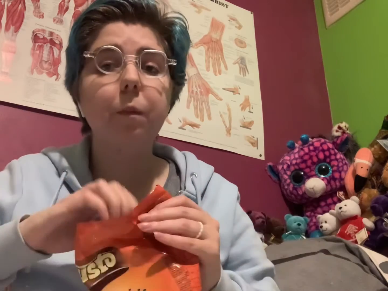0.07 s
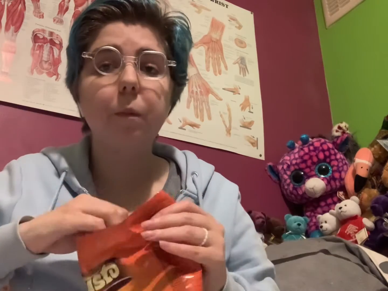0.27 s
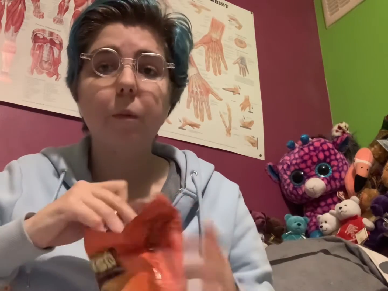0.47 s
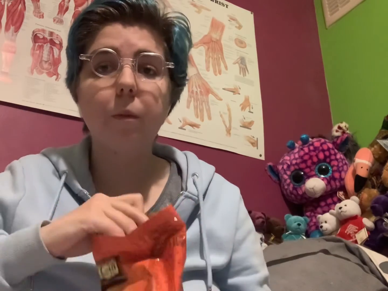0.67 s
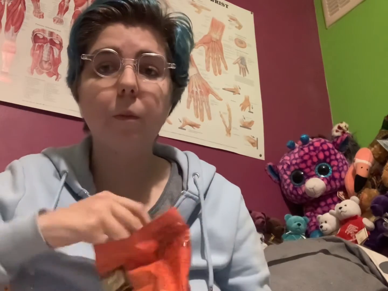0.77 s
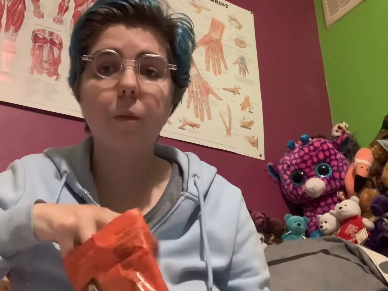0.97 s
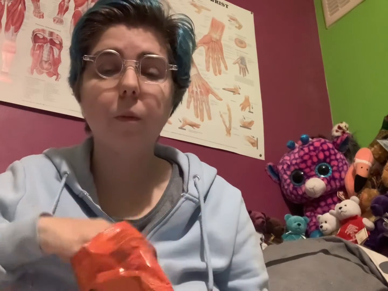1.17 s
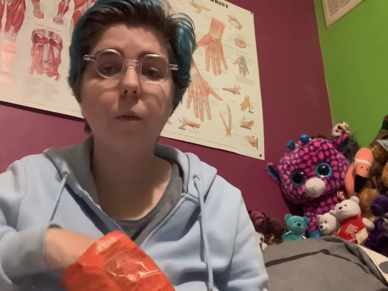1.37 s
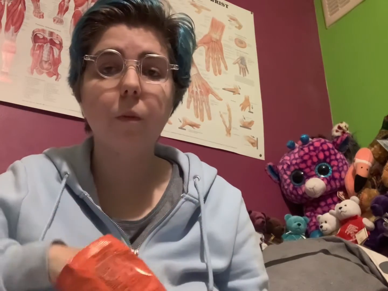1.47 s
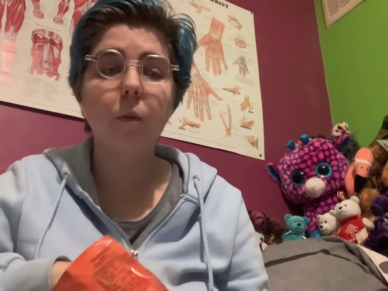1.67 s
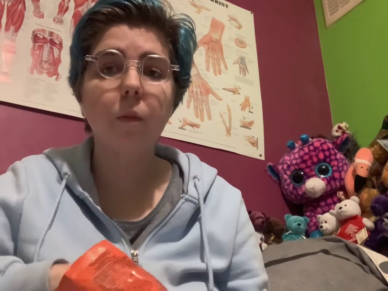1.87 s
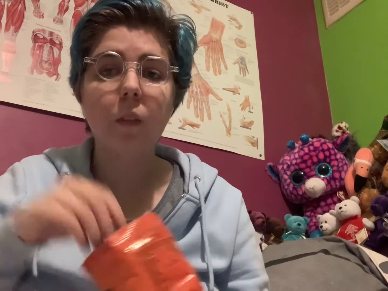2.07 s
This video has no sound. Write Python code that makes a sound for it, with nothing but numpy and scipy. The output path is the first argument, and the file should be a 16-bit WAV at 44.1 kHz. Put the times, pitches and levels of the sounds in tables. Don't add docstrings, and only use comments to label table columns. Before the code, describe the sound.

A foil crisp packet crinkles and snaps sharply in someone's hands, then rustles away softly.

```python
import sys
import numpy as np
from scipy import signal
from scipy.fft import rfft, irfft, next_fast_len
from scipy.io import wavfile
from scipy.ndimage import uniform_filter1d

SR = 44100
rng = np.random.default_rng(int(sys.argv[2]) if len(sys.argv) > 2 else 0)


def wav_out(sig):
    wavfile.write(sys.argv[1], SR, np.round(np.clip(np.atleast_2d(sig).T, -1, 1) * 32767).astype(np.int16))


def invert_db(level):
    return 10 ** (np.asarray(level, dtype=float) / 20)


N = 93315

# t/s, level/dB (peak), bag air/dB re peak, dullness/dB (panel minus sheen)
FOIL_SNAPS = [(0.0239, -31.5, -9.5, 18), (0.0383, -21, -30, 12), (0.0511, -7.5, -31, -26),
              (0.0553, -11.5, -25.5, -1.5), (0.077, -19.5, -22.5, 1), (0.0937, -18, -9, -5),
              (0.1123, -26, -28, -13), (0.117, -26, -21, -11), (0.1408, -24, -28, 8),
              (0.151, -14, -32, -14.5), (0.1587, -39, -33, 0), (0.1768, -25.5, -34, 13),
              (0.1946, -16.5, -33, -1.5), (0.2234, -19, -20, 3), (0.2295, -15.5, -16, -8.5),
              (0.2585, -23.0, -15.5, 5), (0.2691, -21, -11.5, -4), (0.2809, -29, -16, -39),
              (0.2981, -30, -11, 7), (0.3101, -26, -9, 6.0), (0.315, -27, -13.0, 8),
              (0.3201, -22.5, -28, 0), (0.3303, -30, -30, 7), (0.3393, -25, -3.5, 23.5),
              (0.3419, -16.5, -13.5, 5), (0.3536, -37, -31, -8), (0.3683, -20, -20, -21),
              (0.3724, -22.5, -9, 16), (0.3766, -34, -27, 0), (0.3802, -23, -29, -10),
              (0.3966, -26, -10, 13), (0.4002, -35, 3, 6), (0.4181, -20.5, -18, -12),
              (0.423, -12, -18.5, 2), (0.4294, -14.5, -14.5, -4.0), (0.4807, -33, -23, -11),
              (0.4962, -18.5, -22.0, -1), (0.5019, -18.5, -12, 16.5), (0.5245, -21.5, -12, 14),
              (0.5539, -31, -12, 27), (0.5877, -35.0, -19.0, 4), (0.609, -28, -19, 36),
              (0.6249, -26.5, -44, -10.0), (0.637, -28, -9, -17),
              (0.6486, -30.5, -8, -14.0), (0.663, -26, -18, 0), (0.667, -25, -10, -19),
              (0.697, -31.5, -12, -10), (0.708, -31, -32, -14), (0.7108, -27, -25, -2.0),
              (0.7308, -21, -20.5, -13), (0.736, -23.5, -12, 6), (0.7558, -22.5, -17.5, 19),
              (0.7661, -22, -18, 7), (0.7778, -23.0, -20, -12), (0.8106, -28, -14, -4),
              (0.822, -32, -5.5, -7.0), (0.8426, -19, -15, -17), (0.851, -20, -20.0, -13),
              (0.8599, -13, -22, -7.0), (0.879, -19.5, -23, 10), (0.8853, -27.5, -20, -9),
              (0.9125, -12, -21.5, -7.5), (0.9177, -2, -19.5, -3), (0.9459, -25, -8, 2.5),
              (0.9501, -28.5, -2, 10), (0.9698, -18.5, -21, -9), (0.9747, -11.5, -20, -7.5),
              (1.0112, -16.5, -11, 15), (1.0319, -23.5, -15.5, 6), (1.0778, -30, -8, 9),
              (1.0808, -32.5, -14, -2.0), (1.1092, -18.5, -14.5, -9), (1.1216, -28.5, -7, -18),
              (1.1321, -27.5, -12.5, -1.0), (1.1348, -23.0, -30, 6), (1.1453, -31, -15, -2),
              (1.1586, -32, -3, -7.5), (1.176, -11.5, -23.5, -5), (1.198, -6.5, -20.5, -14),
              (1.2022, -18, -28, -16), (1.2054, -19, -21.0, 13.5), (1.2112, -9, -30, -4.5),
              (1.2157, -6.5, -12.5, -4), (1.231, -18, -10, -7), (1.2486, -7.5, -27, -6),
              (1.263, -10.5, -10.5, -14.5), (1.302, -41, -10, -19),
              (1.3212, -16, -24.5, 21), (1.3657, -14.5, -15.0, -20), (1.3764, -27.5, -3.5, 0.0),
               (1.3971, -22, -11, -7), (1.4241, -27.5, -13.0, 10), (1.4353, -25, -8.0, -2),
               (1.472, -34, -18, 11), (1.4773, -40, -17.0, 4.0), (1.4812, -26.5, -10.5, 11),
               (1.498, -30, -11, -5), (1.5067, -29, -3.5, 23.5), (1.5456, -49, -11, 0.0),
               (1.5673, -32, -9, 8), (1.574, -26.0, -12.5, 3), (1.588, -22, -19.5, -3),
               (1.6112, -16.5, -25.5, -6.5), (1.6554, -19.5, -17.5, 5.5), (1.7107, -32.5, -17.5, 4),
               (1.7143, -33, -16, -8.0), (1.7318, -40.5, -11.0, -8), (1.748, -39, -15, -11),
               (1.7698, -40, -13, -3), (1.79, -44, -19, 4.0), (1.8016, -61, -31, -15),
               (1.8174, -48, 4.0, 5), (1.8273, -45, -8, 15), (1.8385, -44.5, -29, -8.0),
               (1.8543, -38.5, -15.5, 17), (1.8593, -45.5, -23, 3), (1.8929, -50, -10.5, 12),
               (1.9344, -47, -30, -1), (1.9526, -29.0, -24, -9.0), (1.964, -37, -9.5, -26),
               (1.971, -37, -19.0, -21), (1.9746, -45, -23.0, -26), (2.0082, -37, -27, 8),
               (2.038, -49.5, -26.0, 1.0), (2.0497, -58, -22, 16), (2.0737, -39, -40, -8),
               (2.098, -32.0, -27, -4), (2.1063, -32.0, -29, 7)]
# t/s, crackle level/dB, finger pressure level/dB
HANDLING = [(0, -52, -55), (.06, -44, -52.5), (.39, -46.5, -52.5), (.44, -36.5, -45), (.58, -54.5, -62),
            (.66, -45.5, -57.5), (.83, -42.5, -52), (.93, -28.5, -44.5), (1.072, -44.5, -55),
            (1.17, -41.5, -59), (1.219, -28, -43), (1.3, -38, -49.5), (1.542, -55.5, -64),
            (1.6, -39, -51.5), (1.7, -56.5, -56), (1.92, -71, -75.5), (2.01, -57.5, -65), (2.06, -66, -74)]
# f/Hz, level/dB
FOIL_COLOUR = [(200, -10), (600, 4), (1000, 0.5), (2300, -3), (3700, -6.5), (5500, -7), (9000, -13),
               (15000, -5.5)]
# f/Hz, level/dB
SQUEEZE_COLOUR = [(25, -48), (50, -7), (80, -6.5), (150, -1.5), (350, -3), (900, -21), (3000, -63.5)]
# f/Hz, lead/rad
PORT_LEAD = [(300, .5), (2600, .15), (5000, 1.3), (8000, 3.2), (10400, .9), (12800, 0), (14700, -2.9),
             (16200, -3.14)]
# f/Hz, level/dB
PORT_TILT = [(150, 6), (400, 3), (1100, -.5), (4000, 0)]
# f/Hz, level/dB
PORT_DIFFUSE = [(450, -6), (1500, -6), (5000, -2), (12500, -7), (14800, -15)]
# t/s, level/dB (peak), f/Hz
BAG_PUSHES = [(0.07, -48, 95.5), (0.098, -44, 82.5), (0.251, -44, 96), (0.277, -37, 255),
              (0.379, -40.5, 142), (0.401, -37.5, 168), (0.425, -49, 83), (0.459, -37, 225),
              (0.519, -44.5, 82.5), (0.764, -42.5, 164), (0.785, -49.5, 55), (0.864, -55, 55),
              (0.908, -38.5, 250), (0.919, -42.5, 83), (0.923, -32, 335), (0.947, -49, 72),
              (0.978, -36, 338), (1.195, -34.5, 340), (1.222, -34.5, 221), (1.25, -34, 293),
              (1.267, -28, 336), (1.279, -42.5, 72), (1.281, -36, 294)]


def evened(x):
    return x / np.sqrt(np.mean(x ** 2) + 1e-20)


def read(points, hz):
    f, value = np.transpose(points)
    return np.interp(np.log(hz + 1), np.log(f + 1), value)


def coloured(x, points):
    hz = abs(np.fft.fftfreq(4096, 1 / SR))
    log_gain = np.log(invert_db(read(points, hz)))
    min_phase = np.exp(np.conj(signal.hilbert(log_gain)))
    taps = np.fft.ifft(min_phase).real[:2048]
    return signal.oaconvolve(x, taps)[:len(x)]


def ring(x, hz, width_hz):
    r = np.exp(-np.pi * width_hz / SR)
    y = signal.lfilter([1, 0, -1], [1, -2 * r * np.cos(2 * np.pi * hz / SR), r * r], x)
    return y / abs(y).max()


def clicks(per_s, spread_db):
    level_db = spread_db * np.minimum(rng.exponential(1, N), 3)
    size = invert_db(level_db) * rng.choice([-1., 1.], N)
    return size * (rng.random(N) < per_s / SR)


def clumps(span_s):
    size = max(int(span_s * SR), 2)
    smooth = uniform_filter1d(rng.standard_normal(N), size)
    return evened(uniform_filter1d(smooth, size))


def hands(column):
    t_s = [row[0] for row in HANDLING]
    level_db = [row[column] for row in HANDLING]
    return invert_db(np.interp(np.arange(N) / SR, t_s, level_db))


def hush():
    return invert_db(-89) * evened(coloured(rng.standard_normal(N), FOIL_COLOUR))


def crackle():
    ticks_per_s, spread_db, tick_s, level_db, bands = 3000, 3.5, 0.00049, -1, 40
    t, out = np.arange(400) / SR, np.zeros(N)
    train = clicks(ticks_per_s, spread_db)
    band = rng.integers(0, bands, N)
    for k, hz in enumerate(np.geomspace(650, 14000, bands)):
        decay_s = tick_s * rng.uniform(0.11, 4.6)
        burst = rng.standard_normal(400) * np.exp(-t / decay_s)
        tick = evened(ring(burst, hz, 0.69 * hz)) * np.sqrt(hz / 5000)
        tick = tick + 0.13 * evened(burst)
        out += signal.oaconvolve(train * (band == k), tick)[:N]
    clump = invert_db(1.55 * clumps(0.005) + 0.8 * clumps(0.025))
    return invert_db(level_db) * hands(column=1) * evened(coloured(out * clump, FOIL_COLOUR))


def thuds():
    thuds_per_s, spread_db, level_db, apart = 300, 2, -1, 1
    a, b = (evened(coloured(clicks(thuds_per_s, spread_db), SQUEEZE_COLOUR)) for _ in "LR")
    both = np.array([a, evened(a + apart * b)])
    return invert_db(level_db) * hands(column=2) * invert_db([[3], [-3]]) * both


def snaps():
    creep_s, creep_db, rise_s, snap_s = 0.0042, -31, 0.00021, 0.00071
    rattle_s, rattle_db = 0.0057, -21.5
    edge_hz, edge_db, sheen_hz, sheen_db = 5640, -3.5, 9880, -7.5
    panel_hz, panel_width_hz, panel_db = 2230, 1120, -7
    bag_hz, bag_width_hz, bag_lift_db, bag_delay_s = 544, 164, 1.5, 0.00141
    t, out = (np.arange(1500) - 400) / SR, np.zeros(N + 1900)
    late = np.exp(-abs(t - bag_delay_s) / snap_s)
    creep = invert_db(creep_db) * np.exp(t / creep_s)
    after = invert_db(rattle_db) * np.exp(-t / rattle_s)
    around = np.where(t > 0, after, creep)
    crack_shape = np.exp(np.minimum(-t / snap_s, t / rise_s))
    for s, db, bag_db, dull_db in FOIL_SNAPS:
        noise, lumps = rng.standard_normal(1500), rng.standard_normal(1500)
        shift = rng.uniform(0.87, 1.217, 4)
        rattle = around * invert_db(5.67 * evened(uniform_filter1d(lumps, size=24)))
        crack = noise * (crack_shape + rattle)
        edge = invert_db(edge_db) * ring(crack, edge_hz * shift[0], 3200)
        panel = invert_db(panel_db + dull_db / 2) * ring(crack, panel_hz * shift[1], panel_width_hz)
        sheen = invert_db(sheen_db - dull_db / 2) * ring(crack, sheen_hz * shift[2], 10000)
        push = late * (1 + lumps) + uniform_filter1d(crack, size=12)
        air = ring(ring(push, bag_hz * shift[3], bag_width_hz), bag_hz, 1440)
        sound = edge + panel + sheen + invert_db(bag_db + bag_lift_db) * air
        at = round(s * SR)
        out[at:at + 1500] += invert_db(db + 1.5) * sound / abs(sound).max()
    return out[410:N + 410]


def pushes():
    width_cycles, apart_rad = 0.89, 0.86
    t, out = np.arange(N) / SR, np.zeros((2, N))
    for s, db, hz in BAG_PUSHES:
        start, spread = rng.random(2)
        at = round(s * SR)
        near = slice(max(at - 3000, 0), at + 3000)
        turns = (t[near] - s) * hz
        lag = np.array([[0], [apart_rad * (1 + spread)]])
        phase = 2 * np.pi * (turns + start) - lag
        out[:, near] += invert_db(db) * np.exp(-0.5 * (turns / width_cycles) ** 2) * np.cos(phase)
    return out * invert_db([[3], [-3]])


def tail(t60_s, count):
    at = np.arange(count) * 20 + rng.integers(0, 20, count)
    taps = np.zeros(20 * count)
    taps[at] = rng.choice([-1., 1.], count) * invert_db(-60 * at / SR / t60_s)
    return taps / np.linalg.norm(taps)


def ports(x):
    turn_s, room_t60_s, room_db = 0.05, 0.12, -4.5
    dull_hz, dull_db_per_hz = 11500, -0.0016
    size = next_fast_len(N + 8000)
    hz = np.fft.rfftfreq(size, 1 / SR)
    turn = np.arange(N) / SR / turn_s
    half = invert_db(read(PORT_TILT, hz) / 2) * np.exp(-0.5j * read(PORT_LEAD, hz))
    diffuse = invert_db(read(PORT_DIFFUSE, hz))
    out = np.zeros((2, len(hz)), complex)
    for k in range(6):
        pose = np.clip(1 - abs((turn - k) % 6 - 1), 0, 1)
        z = rfft(x * pose, size)
        for port, direct in enumerate((half, 1 / half)):
            scatter = rfft(tail(0.015, count=30), size)
            late = np.r_[np.zeros(200), tail(room_t60_s, count=400)]
            room = invert_db(room_db) * rfft(late, size)
            out[port] += z * direct * (1 + (scatter + room) * diffuse)
    dulling = invert_db(dull_db_per_hz * (np.maximum(hz, dull_hz) - dull_hz))
    return irfft(out * dulling, size)[:, :N]


def scene():
    return ports(hush() + crackle() + snaps()) + thuds() + pushes()


def roll_off(x):
    return signal.sosfilt(signal.butter(12, 16640, fs=SR, output="sos"), x)


def record(dry):
    ceiling = 0.75
    return roll_off(ceiling * np.tanh(dry / ceiling))


dry = scene()
out = record(dry)
wav_out(out)
```